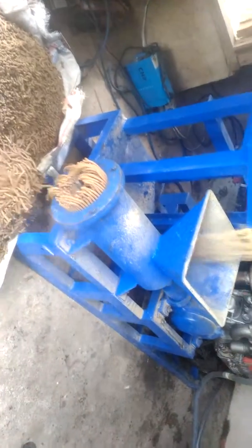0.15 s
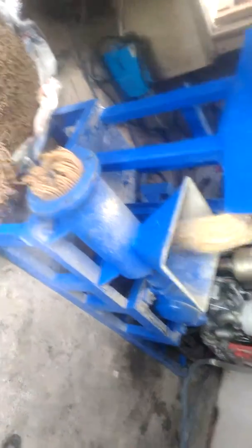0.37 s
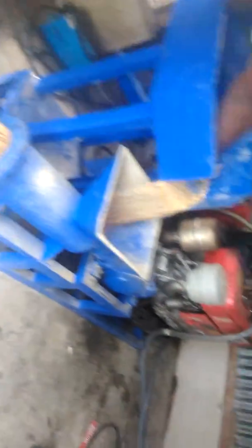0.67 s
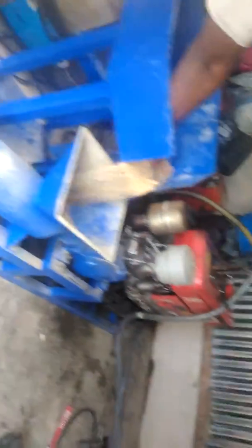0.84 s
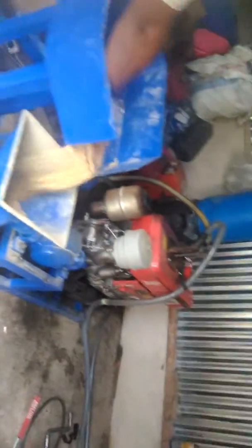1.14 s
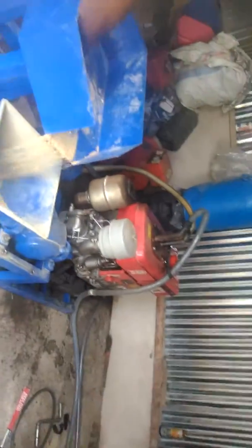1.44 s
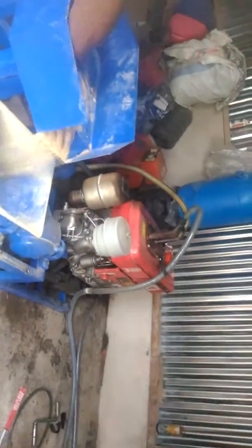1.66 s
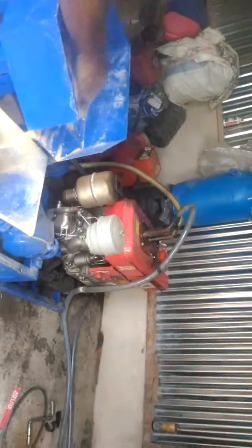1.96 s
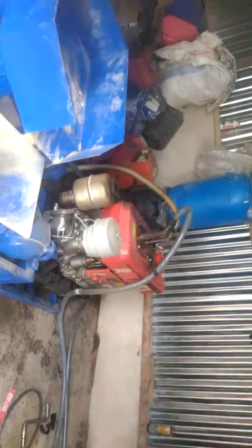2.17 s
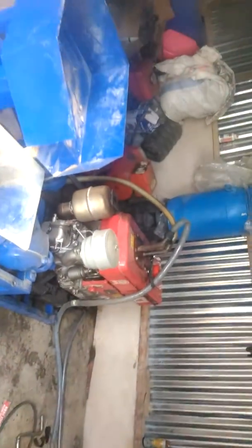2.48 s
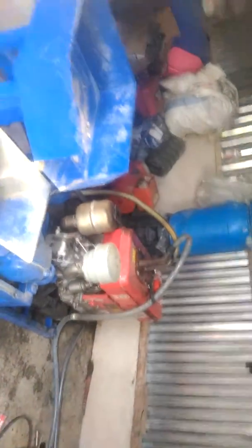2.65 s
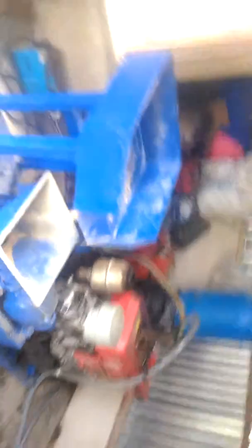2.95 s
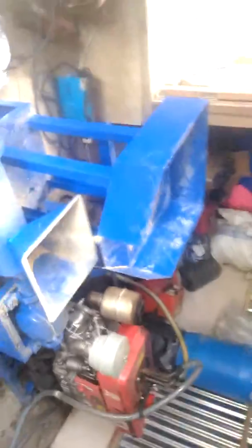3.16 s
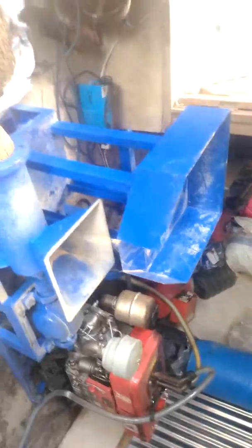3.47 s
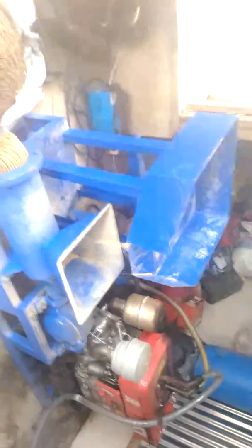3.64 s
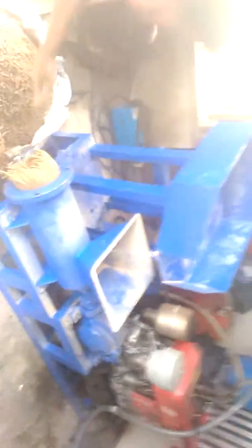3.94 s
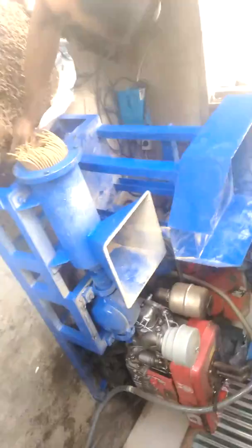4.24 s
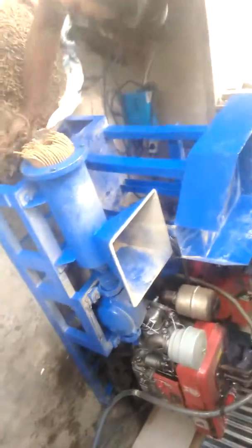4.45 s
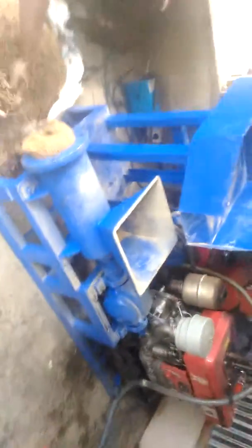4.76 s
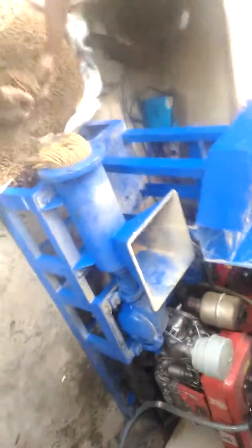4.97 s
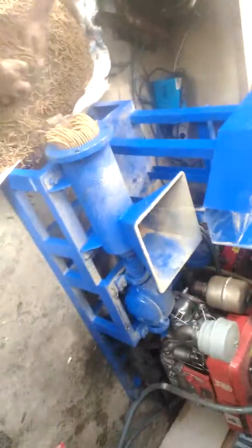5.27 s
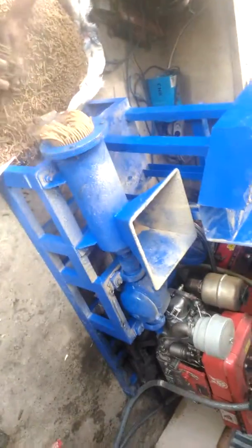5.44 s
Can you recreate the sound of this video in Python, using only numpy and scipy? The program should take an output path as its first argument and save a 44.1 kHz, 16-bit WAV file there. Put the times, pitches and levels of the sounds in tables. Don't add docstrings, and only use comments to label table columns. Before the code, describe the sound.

A handheld phone captures a pellet mill driven by a small diesel engine: fast regular chugging, sharp metallic ticks, hollow pipe and hopper tones, and constant rough clatter. The hollow boom fades as the phone turns, then returns. Late on, a gust and passing palm overload the microphone with low bumps and a rasping puff, briefly changing the engine's tone, before the steady knocking continues to the end.

```python
import sys
import numpy as np
from scipy import signal
from scipy.fft import rfft, irfft
from scipy.io import wavfile
from scipy.ndimage import uniform_filter1d

SR = 44100
rng = np.random.default_rng(int(sys.argv[2]) if len(sys.argv) > 2 else 0)


def transcribe(u):
    v = np.clip(np.atleast_2d(u).T, -1, 1)
    q = np.round(v * 32767).astype(np.int16)
    wavfile.write(sys.argv[1], SR, q)


def undo_db(level):
    steps = np.asarray(level, float) / 20
    return 10 ** steps


N = 247401

CYCLE_HZ, START_CYCLE = 12.94135, .21757
# time_s, lead_cycles
CRANK_LEAD = [(0, 0), (1, -.009), (2, .004), (2.6, .013), (3.05, .012), (4.4, -.028), (5, -.027),
              (5.6, .003)]
STROKES = [
    (0.245, -0.023, 0.09),
    (0.536, 0.007, 0.03),
    (0.744, -0.02, 0.048),
    (1.001, 0.023, 0.074),
]
KNOCK_PLACE = .716
# centre_hz, width_hz, decay_s, trim_db
KNOCK_BODY = [
    (3335, 145, 0.023, 1),
    (7040, 1240, 0.014, 1.5),
    (10300, 1100, 0.0047, 3.5),
]
# top_db,
# shortfall_db
KNOCK_LEVELS = [
    (-59.5, 3),
    (-55, 11),
    (-64, 1),
]
# time_s, ring_db, hiss_db, tick_db
SET_KNOCKS = [(.116, -2, -16, -3), (.579, -3.5, -7, -2), (.966, 3, -8, -2), (1.121, -6, -5, -2),
              (1.584, -3, -7, -5), (1.894, -5, -8, -2), (2.048, -1, -14, -2), (2.279, -5.5, -5, 1),
              (2.511, -4, -7, 2.5), (2.585, 0.5, -4, -7), (2.741, -10, -4, -9), (2.819, -4, -4, 6),
              (3.594, 1.5, -2, -15), (3.671, -4, -5, -3), (3.903, 2.5, -5, -9), (4.059, -5, -2, 3),
              (4.135, -3, -1, 3.5), (4.212, -2, -7, 4), (4.29, -6, -4, 1), (4.446, 4.5, -2, 3.5),
              (4.756, 0, -7, 0), (5.14, -5, -7, 0), (.037, -12, -18, -5), (.502, -2, -11, -17.5),
              (3.361, -8, -1, -7), (1.198, -3, -13, -5), (1.506, -1, -13, -14)]
# place_cycles, pitch_hz, t60_s, level_db
PIPE_RINGS = [(0.566, 77.4, 0.67, -48.6), (0.598, 105.5, 0.1, -48.0), (0.265, 130.7, 0.8, -61.1),
              (0.255, 156.8, 0.28, -59.2), (0.192, 233.1, 0.63, -67.4), (0.277, 292.3, 0.06, -51.2),
              (0.208, 333.1, 0.08, -52.4), (0.239, 354.2, 0.54, -64.9)]
# place_cycles, pitch_hz, t60_s, level_db
METAL_RINGS = [(.44, 429, .5, -74), (.456, 516, .3, -76), (.673, 554, .5, -75), (.477, 668, .2, -66),
               (.487, 745, .2, -63), (.648, 762, .12, -63), (.698, 845, .04, -55), (.44, 861, .12, -61),
               (.47, 1050, .07, -62), (.712, 1085, .12, -63), (.468, 1170, .07, -64), (.56, 910, .1, -65),
               (.6, 1265, .09, -65),
               (.47, 1716, .08, -70), (.52, 2050, .04, -72), (.57, 2540, .05, -74)]
# time_s, level_db
HOPPER_BOOM = [(0, -52), (.7, -56), (1.4, -89), (3.4, -70.5), (4.1, -52.5), (5.6, -60)]
BOOM_PLACE, BOOM_HZ, BOOM_T60_S = .25, 222, .1
# pitch_hz, level_db (per Hz)
CLATTER_COLOUR = [(100, -23), (150, -3.5), (200, -14.5), (310, -13), (480, -12), (620, -12.5), (900, -11),
                  (1300, -15.5), (2250, -22), (3700, -18), (6000, -21), (7800, -23), (11000, -34.5),
                  (11600, -38), (14400, -44)]
# place_cycles, low_db, high_db
CLATTER_CYCLE = [(0, -3.5, -3.5), (.1, -2.5, -5.5), (.43, -5.5, -7), (.46, 0, -4.5), (.64, -2, -5.5),
                 (.69, -0.5, -0.5), (1, -1.5, -4.5)]
# pitch_hz, width_hz, peak_db
CASINGS = [(820, 260, 1), (900, 31, -3), (1123, 78, 3.5), (1706, 7, 6), (2564, 54, 5), (3500, 150, 2.5),
           (4920, 1640, 4), (6970, 930, 5.5), (10700, 850, 4.5)]
# time_s, clatter_db
FACING = [(0, -0.5), (1, 1.5), (2, .5), (3, 1.4), (4, 1.5), (4.43, 2.5), (5.05, 2), (5.6, 3)]
FACING_TREBLE_SHARE, FACING_TREBLE_DB = 0.49, -1.43
# time_s, cover
PALM_COVER = [(4.43, -0.21), (4.505, 0.64), (4.6, 0.86), (4.68, 0.41), (4.73, 1), (4.8, -0.37),
              (4.92, -1.2), (5, -0.63), (5.03, -0.13)]
PALM_HZ = 4350
SHADE_MIDDLE_DB, SHADE_TREBLE_DB, CUP_MIDDLE_DB, CUP_TREBLE_DB = 7.5, -4.5, 2, 9.5
SHADE_RING_DB = 10
SHADE_CRACK_DB, SHADE_CRACK_S = -51.5, 0.014
CUP_HISS_DB = -66
# time_s, pressure, width_ms
EDDIES = [(4.408, -0.044, 92), (4.477, 0.069, 45), (4.543, 0.065, 15), (4.601, -0.11, 29),
          (4.636, 0.27, 36), (4.712, -0.52, 26), (4.804, 0.13, 39), (4.888, 0.066, 26), (4.996, -0.2, 20),
          (5.016, 0.19, 39), (5.083, -0.15, 37), (5.124, 0.12, 51), (5.167, -0.23, 27.5),
          (5.235, 0.018, 210), (5.333, -0.081, 18), (5.387, 0.063, 28), (5.411, -0.062, 28)]
# time_s, pressure_step, fade_s
POPS = [(4.588, .02, .006), (4.978, -0.055, .018), (5.2, -.012, .01), (5.138, .015, .008)]
# middle_s, strength_db, half_length_s
PUFFS = [(4.671, -1, 0.021), (4.799, -16.5, 0.025), (4.868, -22.5, 0.023), (4.994, -17.5, 0.015),
         (5.051, -20.5, 0.012), (5.138, -20, .006)]
# low_hz, high_hz, level_db, slope_db_per_db, length_share, rise_s, fall_s
PUFF_LAYERS = [
    (128, 327, -35, 1.1, 1, 0.0072, 0.035),
    (367, 2140, -46, .55, 0.2, .008, 0.017),
    (2520, 5000, -55.5, 1.3, .8, 0.027, 0.043),
    (6900, 12300, -60, 3.5, 0.93, 0.063, .11),
    (216, 293, -36.5, 1.3, 0.56, 0.0051, 0.0092),
]
RUMBLE_DB, RUMBLE_POWER, RUMBLE_SMEAR_S = -21.5, 0.78, 0.058
TOP_HZ = 14300


def crank(t):
    return START_CYCLE + CYCLE_HZ * t + np.interp(t, *np.transpose(CRANK_LEAD))


def crank_times(cycles):
    at = (cycles - START_CYCLE) / CYCLE_HZ
    return at - np.interp(at, *np.transpose(CRANK_LEAD)) / CYCLE_HZ


def strokes(cycle):
    heave = 0
    for place, size, width in STROKES:
        away = (cycle - place + .5) % 1 - .5
        heave = heave + size * np.exp(-.5 * (away / width) ** 2)
    wander = level(band(rng.standard_normal(N), 3.0, 5.8), -48.5)
    return heave - heave.mean() + wander


def firings():
    at = crank_times(np.arange(72) + KNOCK_PLACE)
    at = at + 0.0011 * rng.standard_normal(len(at))
    top_db, short_db = np.transpose(KNOCK_LEVELS)
    db = top_db - 4.0 - short_db * rng.exponential(size=(len(at), 3))
    for s, *over_db in SET_KNOCKS:
        db[np.argmin(np.abs(at - s))] = top_db + over_db
    db[:, 0] += SHADE_RING_DB * shading(at)[0]
    return at, db


def knocks(t):
    at, db = firings()
    out = np.zeros(N)
    for k, (hz, width, decay_s, trim_db) in enumerate(KNOCK_BODY):
        strength = undo_db(trim_db + db[:, k])
        rebound_at = at + .009 + .004 * rng.random(len(at))
        hits = np.zeros(N + SR)
        hits[(at * SR).astype(int)] = strength
        hits[(rebound_at * SR).astype(int)] = 0.13 * strength
        hits = hits[:N]
        env = uniform_filter1d(fade(hits, decay_s), size=14)
        out += env * level(band(rng.standard_normal(N), hz - width / 2, hz + width / 2), 0)
    crack = fade(1. * (hits > 0), SHADE_CRACK_S) * shading(t)[0]
    crack = uniform_filter1d(crack, size=80)
    out += undo_db(SHADE_CRACK_DB) * crack * level(band(rng.standard_normal(N), 2160, 3950, order=4), 0)
    click = fade(hits, 0.0034)
    return out + click * level(band(rng.standard_normal(N), 8000, 16000, order=1), -8)


def struck(place, hz, t60, db):
    count, lead = np.arange(-12, 74), SR
    at = crank_times(count + place) + 4e-5 * rng.standard_normal(len(count))
    scatter_db = 1.17 * np.sqrt(hz / 1000) * rng.standard_normal(len(count))
    blows = np.zeros(N + 2 * lead)
    blows[(at * SR).astype(int) + lead] = undo_db(db + scatter_db)
    soft = int(SR / hz)
    push = np.hanning(soft) * np.cos(2 * np.pi * hz * np.arange(soft) / SR)
    pushes = np.convolve(blows, 4 * push / soft)[:N + lead]
    return ring(pushes, hz, t60)[lead:]


def rings(table):
    return sum(struck(*row) for row in table)


def hopper_boom(t):
    boom = struck(BOOM_PLACE, BOOM_HZ, BOOM_T60_S, 0)
    return boom * undo_db(np.interp(t, *np.transpose(HOPPER_BOOM)))


def repeating(t, cycle):
    size, hold_s = int(SR / CYCLE_HZ), 1.6
    patterns = rng.standard_normal((int(N / SR / hold_s) + 2, size))
    k, blend = np.divmod(t / hold_s, 1)
    k = k.astype(int)
    place = (cycle % 1 * size).astype(int)
    turn = np.pi / 2 * blend
    return patterns[k, place] * np.cos(turn) + patterns[k + 1, place] * np.sin(turn)


def clatter(t, cycle):
    hz = np.fft.rfftfreq(N, 1 / SR) + 1
    hz_pts, db_pts = np.transpose(CLATTER_COLOUR)
    db = np.interp(np.log(hz), np.log(hz_pts), db_pts)
    for f, width, peak_db in CASINGS:
        db = db + peak_db / (1 + (2 * (hz - f) / width) ** 2)
    same = np.interp(hz, [400, 800, 1300, 2600], [.25, .5, .5, 0])
    steady = np.sqrt(same) * rfft(repeating(t, cycle))
    chance = np.sqrt(1 - same) * rfft(rng.standard_normal(N))
    colour = (steady + chance) * undo_db(db)
    place, low_db, high_db = np.transpose(CLATTER_CYCLE)
    low = np.interp(cycle % 1, place, low_db)
    high = np.interp(cycle % 1, place, high_db)
    out = 0
    for centre in 88 * 2 ** (np.arange(16) / 2):
        window = np.clip(1 - np.abs(2 * np.log2(hz / centre)), 0, 1)
        part = irfft(colour * window, N)
        share = np.clip(np.log2(centre / 1500), 0, 1)
        out = out + part * undo_db((1 - share) * low + share * high + .6 * walk(25))
    return level(out * undo_db(0.97 * walk(400)), -58.0)


def shading(t):
    cover = np.interp(t, *np.transpose(PALM_COVER))
    return np.clip(cover, 0, None), np.clip(-cover, 0, None)


def palm(x, t):
    facing_db = np.interp(t, *np.transpose(FACING))
    shade, cup = shading(t)
    middle_db = facing_db + SHADE_MIDDLE_DB * shade + CUP_MIDDLE_DB * cup
    treble_db = FACING_TREBLE_DB + FACING_TREBLE_SHARE * facing_db
    treble_db = treble_db + SHADE_TREBLE_DB * shade + CUP_TREBLE_DB * cup
    dull = signal.sosfiltfilt(signal.butter(8, PALM_HZ, fs=SR, output="sos"), x)
    bass = signal.sosfiltfilt(signal.butter(4, 660, fs=SR, output="sos"), x)
    return bass + (dull - bass) * undo_db(middle_db) + (x - dull) * undo_db(treble_db)


def puffing(t, slope, share, rise_s, fall_s):
    out = 0
    for s, db, half_s in PUFFS:
        before = np.clip(s - share * half_s - t, 0, None)
        after = np.clip(t - s - share * half_s, 0, None)
        out = out + undo_db(slope * db) * np.exp(-before / rise_s - after / fall_s)
    return out


def wind_noise(lo_hz, hi_hz, order=2):
    return level(band(rng.standard_normal(N), lo_hz, hi_hz, order), 0) * undo_db(walk(40))


def gust(t):
    eddies = sum(size * np.exp(-.5 * ((t - s) / (ms / 2400)) ** 2) for s, size, ms in EDDIES)
    pops = sum(step * (t > s) * np.exp(-np.abs(t - s) / fade_s) for s, step, fade_s in POPS)
    smeared = uniform_filter1d(np.abs(eddies), int(RUMBLE_SMEAR_S * SR))
    stir = np.abs(smeared) ** RUMBLE_POWER
    rumble = undo_db(RUMBLE_DB) * stir * wind_noise(24.6, 55.5, order=4)
    out = eddies + uniform_filter1d(pops, size=60) + rumble
    for lo_hz, hi_hz, db, *shape in PUFF_LAYERS:
        out = out + undo_db(db) * puffing(t, *shape) * wind_noise(lo_hz, hi_hz)
    cup_hiss = undo_db(CUP_HISS_DB) * shading(t)[1] * wind_noise(7300, 16000)
    return out + cup_hiss


def level(x, db):
    return x * undo_db(db) / np.sqrt(np.mean(x ** 2))


def band(x, lo_hz, hi_hz, order=2):
    return signal.sosfilt(signal.butter(order, [lo_hz, hi_hz], "band", fs=SR, output="sos"), x)


def fade(hits, decay_s):
    return signal.lfilter([1], [1, -np.exp(-1 / (decay_s * SR))], hits)


def ring(x, hz, t60):
    pole = np.exp(2j * np.pi * hz / SR - np.log(1000) / (t60 * SR))
    return signal.lfilter([1], [1, -pole], x).imag


def walk(rate):
    k = int(SR / rate)
    held = np.repeat(rng.standard_normal(N // k + 1), k)
    return 1.78 * uniform_filter1d(uniform_filter1d(held, k), k)[:N]


def scene():
    t = np.arange(N) / SR
    cycle = crank(t)
    metal = palm(clatter(t, cycle) + rings(METAL_RINGS), t)
    engine = strokes(cycle) + knocks(t) + rings(PIPE_RINGS) + hopper_boom(t)
    return (engine + metal + gust(t))[None]


def top_cut(x):
    return signal.sosfilt(signal.butter(12, 14480, fs=SR, output="sos"), x)


def record(dry):
    cut = signal.sosfilt(signal.ellip(8, .2, 70, TOP_HZ, fs=SR, output="sos"), dry)
    return top_cut(cut)


dry = scene()
out = record(dry)
transcribe(out)
```